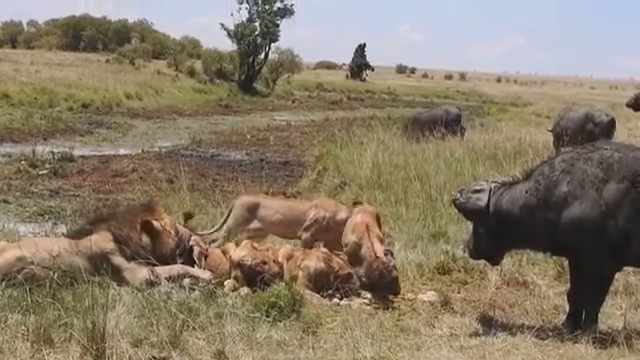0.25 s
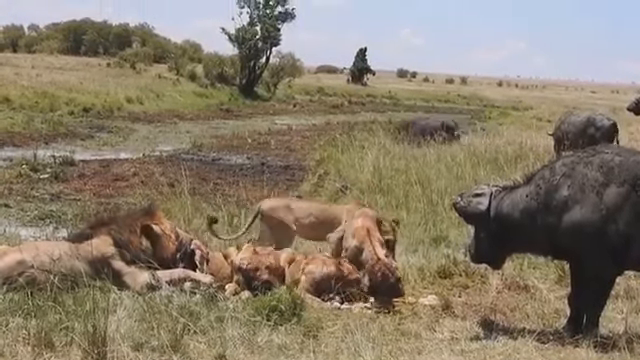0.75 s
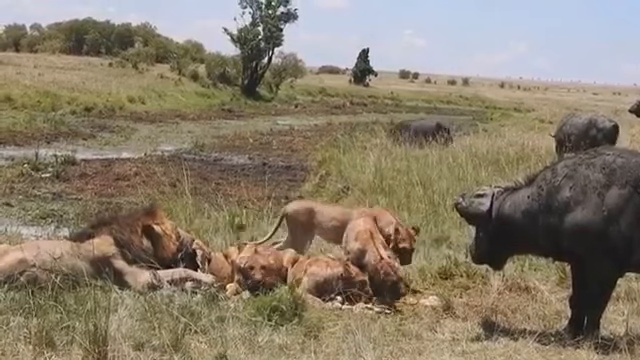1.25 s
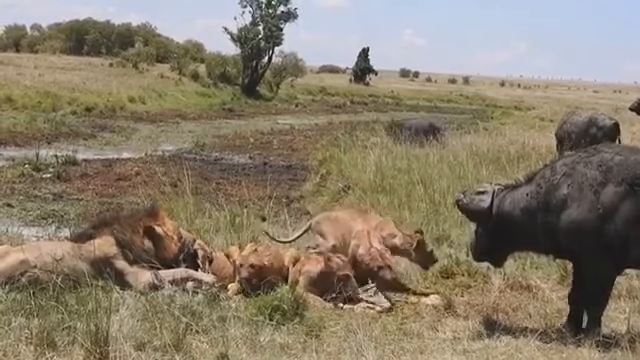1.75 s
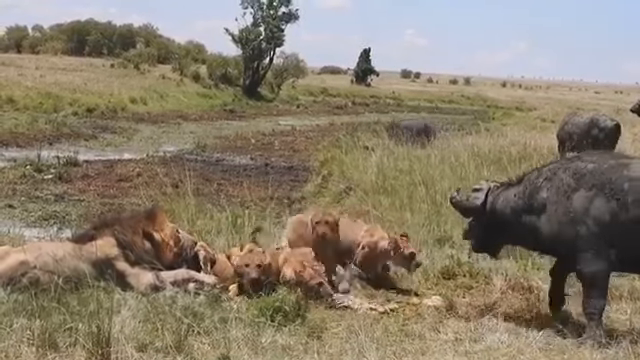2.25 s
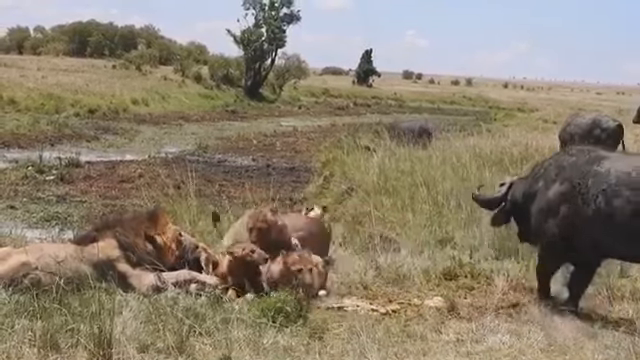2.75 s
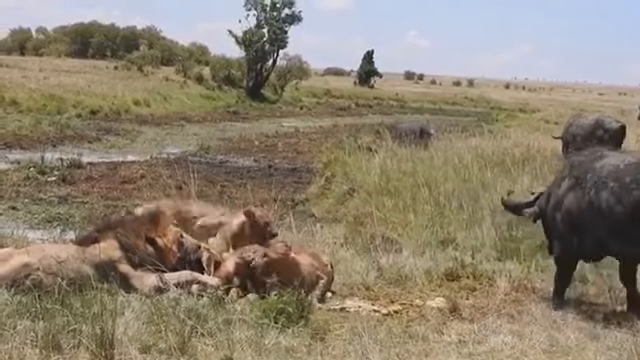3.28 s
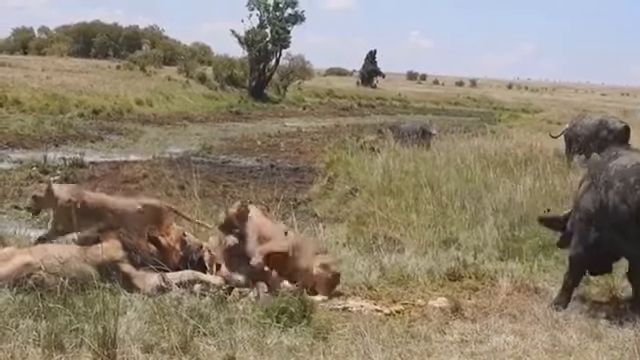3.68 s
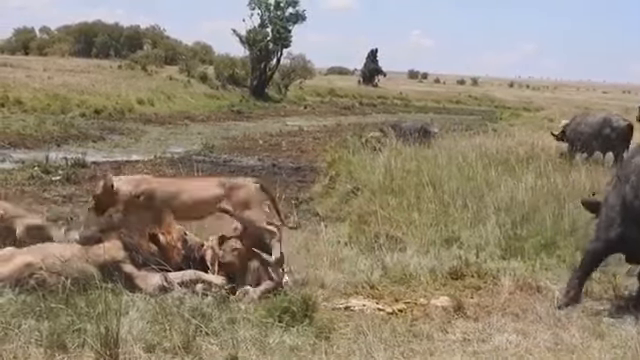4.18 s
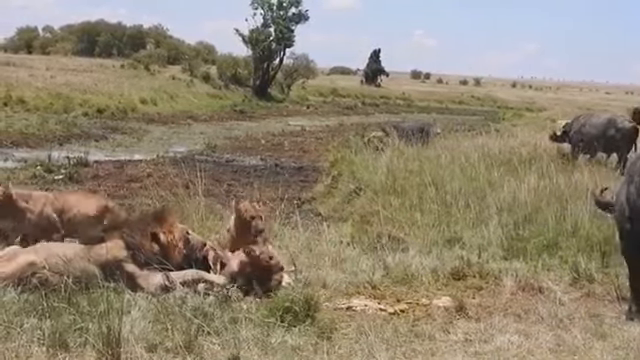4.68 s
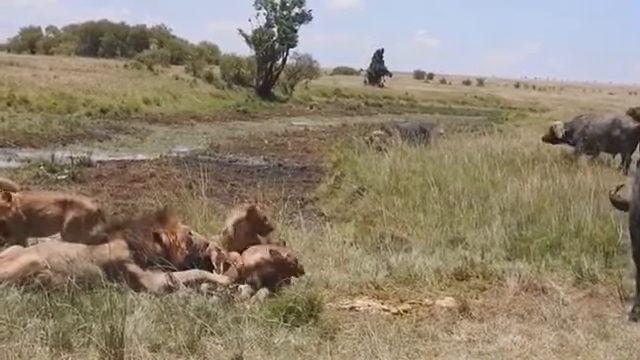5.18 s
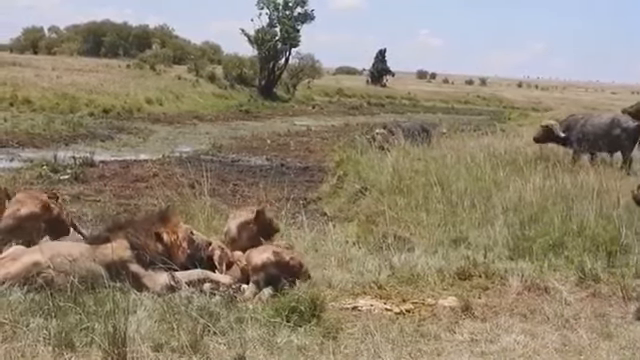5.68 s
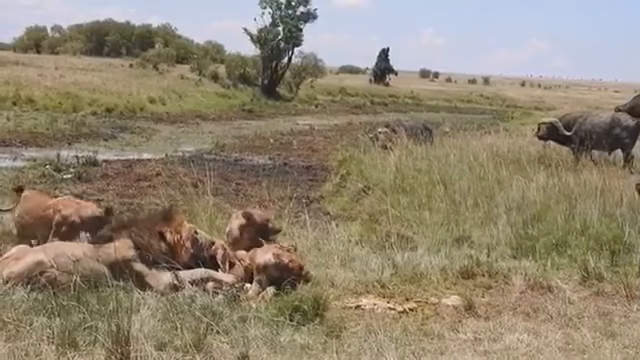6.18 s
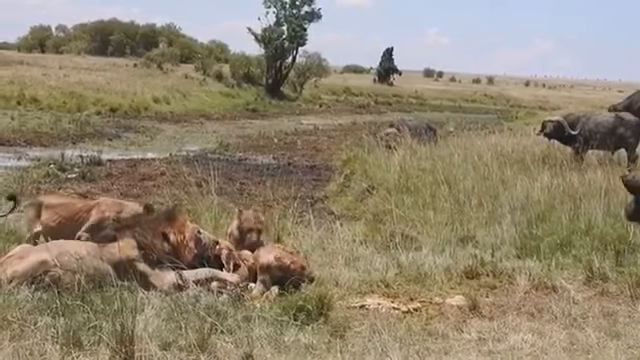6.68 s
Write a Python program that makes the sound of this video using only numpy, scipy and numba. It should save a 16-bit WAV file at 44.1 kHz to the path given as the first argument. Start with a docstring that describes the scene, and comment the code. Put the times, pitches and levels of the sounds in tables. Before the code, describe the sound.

Several lions growl and snarl in low, rattling bursts over a carcass, one lashing out in a rasping roar, with dry grass rustling.

```python
"""Lions squabble over a carcass in open grassland, some way from a nearly mono microphone.
Slack vocal folds flap 20-45 times a second; each flap rings chest and throat and rasps air through the mouth.
One lion lashes out with a roar that trails off in a rattling hiss: pulsed noise through gliding resonances.
Dry grass rustles around them as noise and random snaps; light wind and insects are coloured noise."""
import sys
import numpy as np
from scipy import signal
from scipy.fft import rfft, irfft
from scipy.io import wavfile
from scipy.ndimage import uniform_filter1d
from numba import njit

SR = 44100
rng = np.random.default_rng(int(sys.argv[2]) if len(sys.argv) > 2 else 0)


def master(y):
    """Save y as 16-bit WAV."""
    cut = np.clip(np.atleast_2d(y).T, -1, 1)
    pcm = np.round(cut * 32767)  # scale
    wavfile.write(sys.argv[1], SR, pcm.astype(np.int16))


N = 305608
TIME = np.arange(N) / SR
FLAP_SIZE = 8192  # samples in the ringing of one flap
FREQ = np.fft.rfftfreq(FLAP_SIZE, 1 / SR) + 1  # Hz, kept off zero

# wind over the plain: pitch_hz, relative level_db
AIR_COLOUR = [(40, -21), (55, 10), (80, -1.5), (170, -0.5), (380, -4.5), (620, -14.5), (1800, -20.5),
              (2600, -27.5), (3400, -22.5), (4500, -33), (10000, -34)]
# wind on the microphone: time_s, level_db
BREEZE = [(4.4, -92), (4.9, -49), (5.6, -47), (6.15, -56.5), (6.8, -36.5)]
# spectrum of the dry stalks: pitch_hz, relative level_db
GRASS_COLOUR = [(1200, -50.5), (2500, 16.5), (3300, 6.5), (4200, 13), (5500, 16), (7300, 15), (8500, 5),
                (10000, -6.5)]
# paws and bodies brush the grass: peak_s, relative level_db, decay_s (dying-away time)
RUSTLES = [ (0.15, -29.5, 0.098), (0.379, -32, 0.0067), (0.9, -36, 0.18), (1.67, -39, 0.25),
           (2.24, -27, 0.16), (2.45, -24, 0.036), (2.64, -26.5, 0.036), (2.76, -28.5, 0.26),
           (3.01, -25, 0.12), (3.35, -34.5, 0.79), (3.9, -39.5, 0.27), (4.3, -34, 0.14),
           (4.54, -41.5, 0.64), (5.2, -39, 0.21), (5.73, -38, 0.026), (6.21, -37.5, 0.44),
           (6.673, -28, 0.022), (6.74, -35, 0.036), (6.83, -33.5, 0.033)]
# deep closed-mouth growl under the squabble: time_s, level_db, resonance_hz, width_hz
DRONE = [(1.2, -58, 80.4, 33), (1.7, -44, 77, 30), (2.2, -39, 81, 22), (3.3, -41, 85.5, 28.4),
         (4.77, -39.5, 79.98, 25.9), (4.9, -95, 80.6, 24)]
# short rising moan: time_s, level_db, resonance_hz, width_hz
MOAN = [(6.53, -72, 703, 199), (6.60, -42.5, 720, 239.4), (6.67, -44, 810, 330), (6.75, -45, 1000, 910),
        (6.84, -58, 1300, 900)]
# fluttering end of a snarl: time_s, level_db, resonance_hz, width_hz
FLUTTER = [(4.19, -72, 2020, 397.4), (4.28, -54, 1860, 400), (4.58, -43.5, 1880, 300),
           (4.70, -48.5, 1920, 280), (4.90, -60.5, 1970, 280)]
# dry rattle in the roar's tail, falling as the jaws close: time_s, level_db, resonance_hz, width_hz
RATTLE = [(3.24, -55, 5100, 700), (3.30, -48.5, 5027, 650), (3.47, -47, 4798, 700), (3.58, -54, 4445, 1300),
          (3.68, -46, 3198, 1502), (3.83, -41.5, 2925, 1500), (3.93, -45, 2760, 1698),
          (4.03, -48.5, 2620, 1500), (4.19, -63, 2230, 700)]
# spitting hiss at the height of the roar: time_s, level_db, resonance_hz, width_hz
SPIT = [(2.90, -57, 5640, 500), (2.96, -38.5, 5430, 420.6), (3.04, -41, 5430, 520), (3.12, -60, 5187, 780)]
# deep body resonances: pitch_hz, width_hz, relative level_db
BELLY = [(54, 7.5, -6.5), (82, 12, -1), (118.7, 44, -0.5)]
# chest resonance in a clean voice, by mouth shape: width_hz
CHEST_WIDTH_HZ = {"snarl": 98, "purr": 63, "rumble": 72, "roar": 83, "huff": 130, "grunt": 103}
# resonances of each mouth shape: pitch_hz, width_hz, relative level_db
MOUTHS = { "snarl": [(813, 230, 2), (1018, 50, 8.5), (1176, 120, 11.5), (1490, 345, 7.5), (1730, 110, 7.5),
          (1920, 160, 8), (3420, 440, -4.5), (4200, 700, -20.5), (5600, 700, -18)], "purr": [(1011, 76, 7),
          (1195, 180, 6), (1455, 290, 6), (1880, 340, 5)], "rumble": [(500, 213, 5), (830, 110, 1.5),
          (1000, 100, 5.5), (1784, 510, -1), (2137, 78, -2.5), (3300, 440, -11.5)],
          "roar": [(700, 73.3, 7.5), (860, 300, 8.5), (1100, 360, 6), (1520, 320, 11), (1860, 215, 11.5),
          (2080, 140, 3.5), (2718, 420, -3), (3220, 180, 1.5), (3590, 190, 1.5), (5862, 1950, -12.5)],
          "huff": [(490, 198, -1), (744, 90, 10), (1165, 140, 6), (1790, 440, 4.5), (2950, 750, -9.5)],
          "grunt": [(544, 95.5, 15.5), (735, 61, 9.5), (1064.8, 60, 18.5), (1550, 250, 9), (1880, 240, 7.5),
          (2157, 59, 4), (3370, 410, -2)]}
# growls: start_s, end_s, first_flap_hz, last_flap_hz, rough (0-1), snap of the closure (0-1), mouth shape,
# crest (share of the length, 0-1), fade_db after the crest, relative chest_db, throat_db and rasp_db,
# first_chest_hz, last_chest_hz, throat_hz at the crest
GROWLS = [ (0.066, 0.125, 28.47, 28.5, 0.58, 0.11, "snarl", 0.4, 7.5, -16, -13, -33.5, 182, 186, 376),
          (0.132, 0.223, 30.96, 29.1, 0.54, 0.21, "snarl", 0.04, 15, -15, -21, -23, 235, 196, 334),
          (0.239, 0.345, 34.75, 34.36, 0.49, 0.63, "snarl", 0.1, 2, -27.5, -27, -40, 147, 147, 342),
          (0.354, 0.505, 36.57, 31.95, 0.09, 0.7, "purr", 0.3, 8.5, -22, -34, -53.5, 139, 172, 369),
          (0.535, 0.647, 34.1, 38, 0.23, 0, "purr", 0.1, 4.5, -23, -34, -50, 157, 147, 347),
          (0.671, 0.754, 35.76, 36.5, 0.1, 0.5, "snarl", 0.56, 19, -32, -30.5, -47.5, 151, 148, 360),
          (0.819, 0.875, 25.7, 25.8, 0.2, 0.04, "snarl", 0, 1, -26, -27, -34.5, 125, 125, 308),
          (0.899, 0.953, 29.04, 29.97, 0.67, 0.35, "snarl", 0.01, 7, -28.5, -30, -31, 160, 159, 340.7),
          (0.957, 1.071, 34.1, 32.5, 0.3, 0.75, "purr", 0.63, 0.5, -19.5, -25, -38.5, 160, 151, 326),
          (1.076, 1.249, 35.9, 28.3, 0.13, 0, "purr", 0.08, 4.5, -25, -44, -52.5, 179.6, 150, 327),
          (1.257, 1.481, 31.82, 30.3, 0.28, 0, "snarl", 1, -2, -42.5, -38, -54.5, 171.1, 171, 355),
          (1.524, 1.581, 24.4, 24.6, 0.65, 0.18, "snarl", 0.68, -7, -28, -33, -35, 139, 130, 306.4),
          (1.605, 1.761, 25.94, 25.21, 0.74, 0.35, "snarl", 0, 4, -31.5, -27.5, -34.5, 162, 167, 341),
          (1.761, 1.824, 27.06, 27, 0.13, 0, "purr", 0, 10, -23.5, -32, -60, 192, 185, 334),
          (1.864, 1.968, 33.85, 34.5, 0.05, 0, "purr", 0.9, 3, -26, -44, -63, 182, 163, 314),
          (2.014, 2.128, 40.54, 31, 0.03, 0.36, "rumble", 0.02, 7.5, -16, -44, -35.5, 175, 164.1, 328.6),
          (2.149, 2.229, 41.53, 37.72, 0, 0.28, "rumble", 0.3, 3, -12.5, -27, -32.5, 170, 166, 427),
          (2.259, 2.312, 36.7, 38, 0.1, 0.37, "rumble", 1, 1, -18.5, -35, -29, 161, 164, 403),
          (2.311, 2.474, 42.62, 43.9, 0.14, 0.56, "rumble", 0.25, 2, -12.5, -25.5, -30, 164.6, 177, 415.4),
          (2.492, 2.587, 42.7, 36.87, 0.08, 0.21, "roar", 0.8, -5, -20, -20, -30.5, 190, 158, 370),
          (2.607, 2.706, 35.55, 34.41, 0.16, 0.59, "roar", 0.72, 4.5, -15, -15.5, -24.5, 164, 171, 402),
          (2.7229, 2.791, 36.31, 36.4, 0.2, 0.64, "roar", 0.77, 11, -13, -11.5, -20, 164, 168, 392),
          (2.804, 2.942, 35.87, 36.44, 0.2, 0.58, "roar", 0, 1.5, -17.5, -10, -27.5, 174, 178, 403),
          (2.943, 3.05, 35.06, 32.41, 0.07, 0.69, "roar", 0.3, 4, -13.5, -11, -24.5, 175, 150, 397),
          (3.063, 3.178, 29.62, 30.8, 0.16, 0.47, "roar", 0, 3, -19, -15, -32, 157, 161, 387),
          (3.198, 3.285, 29.31, 31.3, 0.6, 0.3, "snarl", 0, -0.5, -26.5, -30.5, -33.5, 194, 188, 380),
          (3.304, 3.577, 38.87, 38.6, 0.19, 0.4, "snarl", 0.64, 1, -30, -33, -38.5, 206, 196, 380),
          (3.583, 3.643, 36.07, 35.9, 0.55, 0.3, "snarl", 0, 3.5, -26, -26, -33.5, 166, 196, 334),
          (3.671, 3.8, 21.64, 21.8, 0.31, 0.1, "snarl", 1, 7, -29, -21.5, -37.5, 166, 166, 362),
          (3.745, 3.975, 37.64, 41.4, 0.04, 0, "purr", 1, 2, -23.5, -36, -46.5, 141, 179, 292),
          (3.994, 4.143, 28, 28.42, 0.13, 0.2, "purr", 0, 3.5, -23, -37.5, -47.5, 178, 153, 300),
          (4.167, 4.373, 38.43, 36.03, 0.2, 0.05, "purr", 0.62, 8.5, -22.5, -34, -41.5, 136, 150, 269),
          (4.364, 4.571, 24.13, 24.16, 0.31, 0.48, "snarl", 0.43, 2, -33, -28.5, -36, 158.1, 158, 302.7),
          (4.57, 4.641, 42.32, 37.4, 0.3, 0.35, "snarl", 0.18, 10, -30, -19.5, -38.5, 161, 148.5, 342),
          (4.691, 4.949, 31.82, 30.3, 0.23, 0.6, "snarl", 0.3, 3, -54, -48.5, -56, 158, 158, 356.4),
          (4.972, 5.06, 33.25, 24.08, 0.07, 0.43, "huff", 0.5, 1, -39.5, -44, -40, 189, 193, 406),
          (5.077, 5.16, 20.94, 21, 0.9, 0.18, "huff", 0, 3, -53, -45, -40, 193, 193, 436),
          (5.176, 5.239, 32.88, 32.27, 0.91, 0.11, "grunt", 0.3, -3.5, -45.5, -33.5, -46.5, 185, 185, 423.4),
          (5.244, 5.32, 21.45, 21.7, 0.43, 0.54, "grunt", 0.77, 0, -29.5, -27.5, -45.5, 186.1, 180, 444),
          (5.338, 5.51, 21.1, 21.16, 0.27, 0.54, "grunt", 0, 6, -26, -21.5, -41.5, 175, 182, 403),
          (5.599, 5.676, 33.7, 30.9, 0, 0, "purr", 0.12, -4.5, -27, -42.5, -57, 161, 153, 310),
          (5.697, 5.96, 31.83, 31.03, 0.45, 0.6, "rumble", 0.05, 20, -35.5, -36, -41.5, 156, 159, 460),
          (6.016, 6.049, 22.39, 22.4, 0.23, 0.28, "grunt", 0, 2, -38, -25, -43.5, 154, 153.8, 472),
          (6.062, 6.138, 22.98, 22.4, 0.6, 0.28, "grunt", .96, -3, -29.5, -31, -38, 130, 135, 365),
          (6.148, 6.305, 22.15, 22.86, 0.12, 0.33, "grunt", 0, 3, -25.5, -21, -38, 149.7, 162.9, 421),
          (6.441, 6.783, 29.71, 29.15, 0.15, 0, "purr", 0.26, 8, -30.5, -37.5, -61, 163.7, 155, 330),
          (6.791, 6.859, 30.18, 29.9, 0.76, 0.53, "grunt", 0.51, 4.5, -40, -30, -42, 177, 177, 518),
          (6.879, 6.942, 25.7, 26, 0.28, 0.7, "grunt", 0.03, 17, -21.5, -22, -38, 191.3, 181, 421)]

SWELL_DB = 2.5  # rise of the effort from the start of a growl to its crest
THROAT_DB_PER_DB, RASP_DB_PER_DB = 1.7, 1.87  # how steeply throat and mouth follow the effort
THROAT_HZ_PER_DB = 7  # the larynx lifts with effort
THUMP_S, THUMP_DB = 0.03, 8  # a rough snarl starts with a thump of the chest; dB at roughness 1
REBOUND_S, REBOUND_SHARE = 0.01365, 0.34  # in a snarl the folds slap a second time, more softly
PAUSE_S, LEAD_IN_DB = 0.035, -14  # after a pause the folds stir once, softly, before the growl catches


def undb(db):
    """Decibels to gain."""
    return 10 ** (np.asarray(db) / 20)


def unit(x):
    """Scale to rms 1."""
    return x / np.sqrt(np.mean(x ** 2) + 1e-18)


def wobble(spread):
    """A random factor near 1."""
    return np.exp(spread * rng.standard_normal())


def read(table, at):
    """The columns of a curve at the given times."""
    s, *columns = np.transpose(table)
    return [np.interp(at, s, column) for column in columns]


def colour(x, points):
    """Give x a spectrum of (Hz, dB) points, at rms 1."""
    hz, db = np.transpose(points)
    f = np.fft.rfftfreq(len(x), 1 / SR) + 1
    gain = undb(np.interp(np.log(f), np.log(hz), db))
    return unit(irfft(rfft(x) * gain, len(x)))


def add(track, s, sound):
    """Mix a sound into a track at time s."""
    i = int(np.clip(s * SR, 0, N))
    track[i:i + len(sound)] += sound[:N - i]


def plain(insect_db=-58, wind_db=-46, wind_swell_db=2.5):
    """Light wind over the plain and on the microphone, and a thin shimmer of insects on all sides."""
    steps = np.repeat(rng.standard_normal(N // 8000 + 1), 8000)
    swell = uniform_filter1d(steps, size=8000)[:N]
    wind = undb(wind_db + wind_swell_db * swell) * colour(rng.standard_normal(N), AIR_COLOUR)
    # spectra as pitch_hz, relative level_db
    shimmer = [(2500, -26.0), (4500, -14.5), (6400, -8.0), (7600, -12.5), (9000, -37.5)]
    buffet = [(30, -15.0), (55, 4.5), (80, 8.5), (190, -1.0), (300, -24), (600, -32.5), (4000, -53.0)]
    breeze_db, = read(BREEZE, TIME)
    sides = []
    for _ in range(2):
        insects = undb(insect_db) * colour(rng.standard_normal(N), shimmer)
        breeze = undb(breeze_db) * colour(rng.standard_normal(N), buffet)
        sides.append(insects + breeze)
    return wind + np.array(sides)  # the wind over the plain is the same on both sides


def scatter(x, db=-17, t60_s=0.15):
    """Ground and bushes return a faint, dull tail."""
    t = TIME[:SR // 2]
    tail = colour(rng.standard_normal(len(t)), [(100, 4.5), (1500, -8.5), (8000, -12.0)])
    tail = tail * undb(-60 * t / t60_s) * (t > .012)
    return x + undb(db) * signal.fftconvolve(x, tail / np.linalg.norm(tail))[:N]


def stalks(stalks_per_s=900):
    """Dry stalks snap at random, with a few loud ones, over a steady brushing noise."""
    hits = rng.random(N) < stalks_per_s / SR
    loudness = undb(2.5 * np.minimum(rng.exponential(size=N), 4))
    snaps = hits * rng.standard_normal(N) * loudness
    return colour(0.66 * unit(snaps) + rng.standard_normal(N), GRASS_COLOUR)


def grass(side_db, stir_db=-70, rise_share=0.69):
    """Stalks brush and snap under paws and bodies; each rustle builds up and dies away."""
    power = undb(stir_db) ** 2  # the grass never quite rests under the feeding lions
    for s, db, decay_s in RUSTLES:
        # the build-up takes rise_share of the dying-away time
        away_s = np.maximum(TIME - s, (s - TIME) / rise_share)
        power = power + undb(db) ** 2 * np.exp(-2 * away_s / decay_s)
    middle = stalks()
    side = undb(side_db) * stalks() * np.array([[1], [-1]])
    return undb(-13.0) * np.sqrt(power) * (middle + side)


@njit
def sweep(x, hz, width):
    """Band-pass with a moving centre and width: a state-variable filter with gain 1 at the centre."""
    y, band_state, low_state = np.empty(len(x)), 0., 0.
    for i in range(len(x)):
        g, damping = np.tan(np.pi * hz[i] / SR), width[i] / hz[i]
        band = (band_state + g * (x[i] - low_state)) / (1 + g * (g + damping))
        band_state = 2 * band - band_state
        low_state = low_state + 2 * g * band
        y[i] = damping * band
    return y


def pulsed_air(curve, first_s, rate_hz, spurt_share, steady):
    """Spurts of air through one gliding resonance; spurt_share is their decay as a share of the period."""
    db, hz, width = read(curve, TIME)
    phase = ((TIME - first_s) * rate_hz) % 1
    flow = np.exp(-phase / spurt_share) + steady
    spurts = flow * rng.standard_normal(N) / np.sqrt(width)  # even power at any width
    voice = unit(sweep(sweep(spurts, hz, width), hz, width))
    sounding = (TIME > curve[0][0]) & (TIME < curve[-1][0])
    return sounding * undb(db) * voice


def drone():
    """A deep closed-mouth growl: pulsed air through a resonance near 80 Hz."""
    return pulsed_air(DRONE, first_s=1.0, rate_hz=27, spurt_share=0.21, steady=0.12)


def moan():
    """A short moan: pulsed air through a mouth resonance that rises and widens."""
    return pulsed_air(MOAN, first_s=6.61, rate_hz=38, spurt_share=0.32, steady=0.25)


def flutter():
    """The fluttering end of a snarl: short spurts through a mouth resonance near 1900 Hz."""
    return pulsed_air(FLUTTER, first_s=3.9, rate_hz=32.5, spurt_share=0.18, steady=0.039)


def rattle():
    """The roar's dry tail: short spurts through a resonance that falls as the jaws close."""
    return pulsed_air(RATTLE, first_s=3.299, rate_hz=39.0, spurt_share=0.19, steady=0.08)


def spit():
    """The hiss at the height of the roar: longer spurts through a high mouth resonance."""
    return pulsed_air(SPIT, first_s=2.944, rate_hz=31.0, spurt_share=0.4, steady=0.17)


def resonance(hz, width_hz, order=2):
    """Response of a resonance, gain 1 at the centre: order 1 starts at once, order 2 has steep sides."""
    return 1 / (1 + 1j * (FREQ ** 2 - hz ** 2) / (FREQ * width_hz)) ** order


def flesh(hz=490):
    """Frequency response of soft tissue, which passes little above hz."""
    return signal.freqs(*signal.butter(4, hz, analog=True), FREQ)[1]


def puff(rise_s, decay_s):
    """A burst of turbulence that swells and dies, unit energy."""
    t = TIME[:FLAP_SIZE]
    air = rng.standard_normal(FLAP_SIZE) * (1 - np.exp(-t / rise_s)) * np.exp(-t / decay_s)
    return air / np.linalg.norm(air)


def flap(response, snap, rise_s, decay_s):
    """One closure rings a cavity: a clean snap takes its share of the energy, turbulence the rest."""
    share = np.clip(snap, 0, 1)
    clean = irfft(response)
    airy = irfft(rfft(puff(rise_s, decay_s)) * response)
    y = np.sqrt(1 - share) * unit(airy) - np.sqrt(share) * unit(clean)
    return y / np.linalg.norm(y)


def flap_times(start, end, first_hz, last_hz):
    """Times and periods of a run of flaps whose rate glides."""
    s = start
    while s < end:
        period = 1 / np.interp(s, [start, end], [first_hz, last_hz])
        yield s, period
        s += period


def effort(progress, crest, fade_db):
    """Effort in dB along a growl (progress 0-1): it swells to the crest, then changes by -fade_db."""
    crest = np.clip(crest, 0, .99)
    if progress < crest:
        return -SWELL_DB * (1 - progress / crest)
    return -fade_db * (progress - crest) / (1 - crest)


def chest_boom(chest_hz, shape, rough, rise_s):
    """The chest rings on each flap; a rough voice damps it more and shakes the belly."""
    # soft tissue never takes quite the same shape twice
    hz = chest_hz * wobble(0.054 + 0.033 * rough)
    chest = resonance(hz, CHEST_WIDTH_HZ[shape] + 70 * rough)
    if shape == "snarl":
        chest = chest * (1 + REBOUND_SHARE * np.exp(-2j * np.pi * FREQ * REBOUND_S))
    belly = sum(undb(db) * resonance(hz, width) for hz, width, db in BELLY)
    body = (0.015 + 1.54 * rough) * belly + chest
    return flap(body * flesh(), 1 - 1.74 * rough, rise_s, decay_s=0.01)


def throat_knock(throat_hz, shape, rough, rise_s):
    """Open jaws let the throat speak at once; half-closed lips round its knock."""
    hz = throat_hz * wobble(0.02 + 0.2 * rough)
    if shape == "roar":
        throat = resonance(hz, width_hz=63, order=1)
    else:
        throat = resonance(hz, width_hz=94)
    throat = throat + undb(-19.0) * resonance(1.3 * hz, width_hz=32)
    return flap(throat * flesh(), 1 - rough, rise_s, decay_s=0.014)


def mouth_rasp(shape, snap, rough, rise_s):
    """A hard closure cracks sharply out of the jaws; a rough voice leaks air for most of the cycle."""
    # nearly closed lips hold still, so a rumble repeats from flap to flap and keeps its harmonics
    unrest = rough if shape == "rumble" else 1
    mouth = 0
    for hz, width, db in MOUTHS[shape]:
        gain = undb(db) * wobble(0.47 * unrest)
        mouth = mouth + gain * resonance(hz * wobble(0.029 * unrest), width)
    share = np.clip(snap, 0, 1)
    crack = flap(mouth, 1 - rough, rise_s=0.00095, decay_s=0.002)
    leak = flap(mouth, 0, rise_s, decay_s=0.027 + 0.01 * rough)
    return np.sqrt(share) * crack + np.sqrt(1 - share) * leak


def growl_flap(growl, s):
    """One flap of the folds booms in the chest, knocks in the throat and rasps through the mouth."""
    (start, end, _, _, rough, snap, shape, crest, fade_db, chest_db, throat_db, rasp_db,
     first_chest_hz, last_chest_hz, top_throat_hz) = growl
    rise_s = 0.002 + 0.0053 * (1 - snap) ** 4  # a slack closure lets the air build up slowly
    progress = max(s - start, 0) / (end - start)
    push_db = effort(progress, crest, fade_db)
    if s < start:
        push_db += LEAD_IN_DB
    thump_db = 0
    if shape == "snarl":
        thump_db = THUMP_DB * rough * np.exp(-abs(s - start) / THUMP_S)
    # loudness jitters from flap to flap
    chest_jitter, throat_jitter, rasp_jitter = (0.35 + 0.29 * rough) * rng.standard_normal(3)
    chest_db = chest_db + push_db + thump_db + chest_jitter - 3.5
    throat_db = throat_db + THROAT_DB_PER_DB * push_db + throat_jitter - 4.0
    rasp_db = rasp_db + RASP_DB_PER_DB * push_db + rasp_jitter
    chest_hz = first_chest_hz + (last_chest_hz - first_chest_hz) * progress
    throat_hz = top_throat_hz + THROAT_HZ_PER_DB * push_db
    boom = undb(chest_db) * chest_boom(chest_hz, shape, rough, rise_s)
    knock = undb(throat_db) * throat_knock(throat_hz, shape, rough, rise_s)
    rasp = undb(rasp_db) * mouth_rasp(shape, snap, rough, rise_s)
    return boom + knock + rasp


def growls():
    """Runs of flaps follow each other, each run with its own gliding rate, mouth shape and roughness."""
    out, last_end = np.zeros(N), 0
    for growl in GROWLS:
        start, end, first_hz, last_hz, rough = growl[:5]
        flaps = list(flap_times(start, end, first_hz, last_hz))
        if start - last_end > PAUSE_S:
            flaps.insert(0, (start - 1 / first_hz, 1 / first_hz))
        last_end = end
        for s, period in flaps:
            shift_s = .0008 * rough * rng.standard_normal()
            # energy in proportion to the period keeps the power even at any rate
            add(out, s + shift_s, np.sqrt(period * SR) * growl_flap(growl, s))
    return out


def scene():
    """The lions straight ahead, the grass around them, the plain beyond."""
    lions = growls() + spit() + rattle() + flutter() + moan() + drone()
    return scatter(lions) + grass(side_db=-8.5) + plain()


def record(dry, top_hz=10400):
    """The microphone cuts the top with a steep low-pass."""
    return signal.sosfilt(signal.ellip(10, .2, 70, top_hz, fs=SR, output="sos"), dry)


dry = scene()
out = record(dry)
master(out)
```